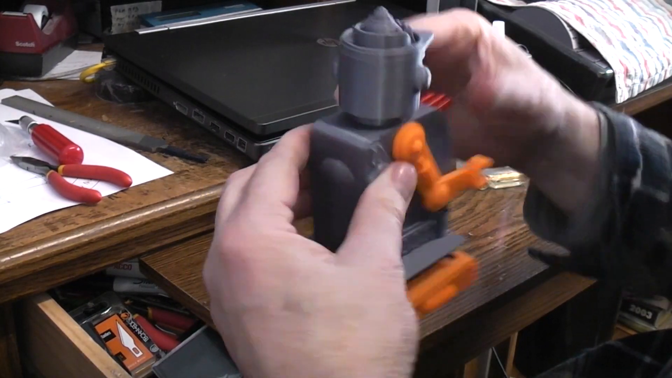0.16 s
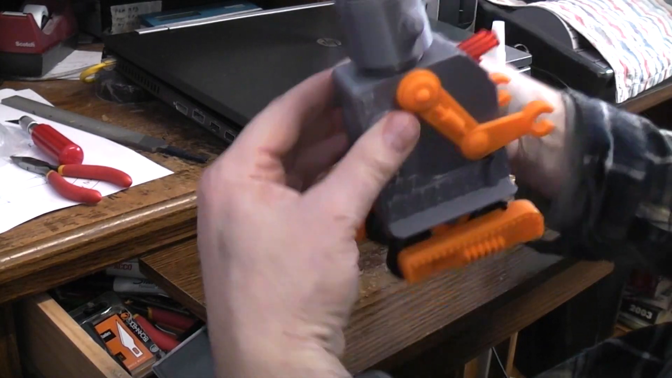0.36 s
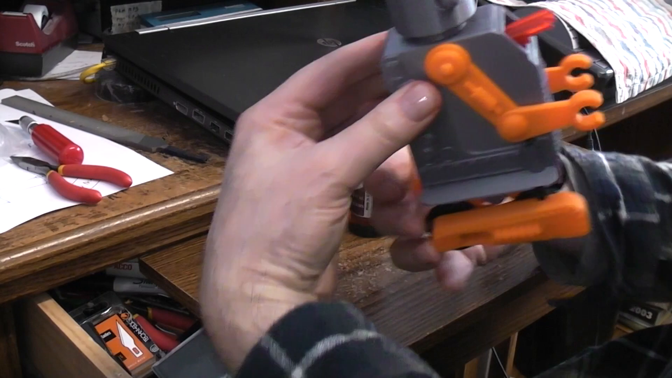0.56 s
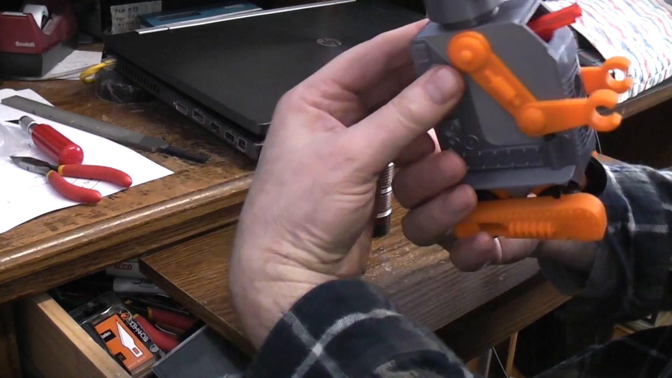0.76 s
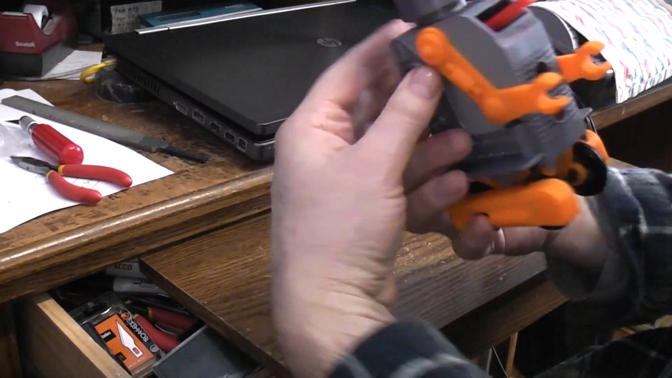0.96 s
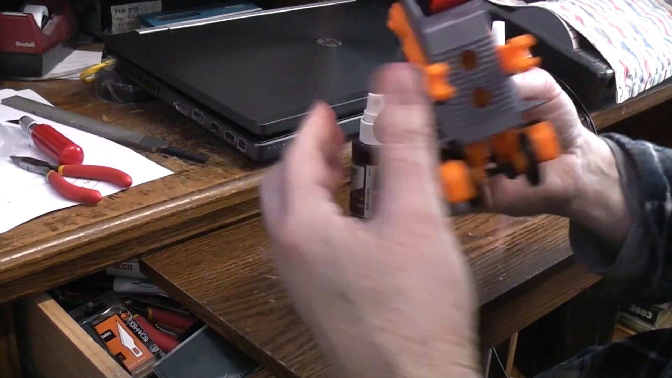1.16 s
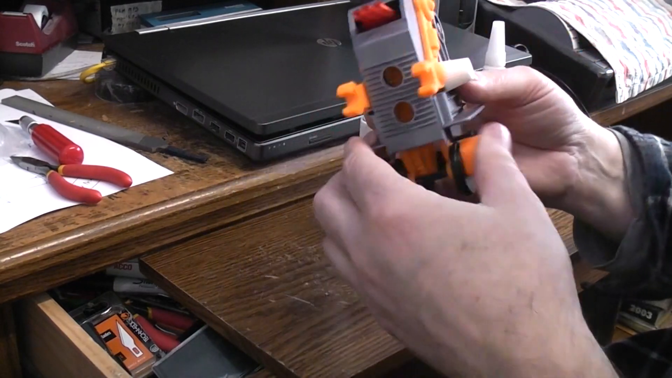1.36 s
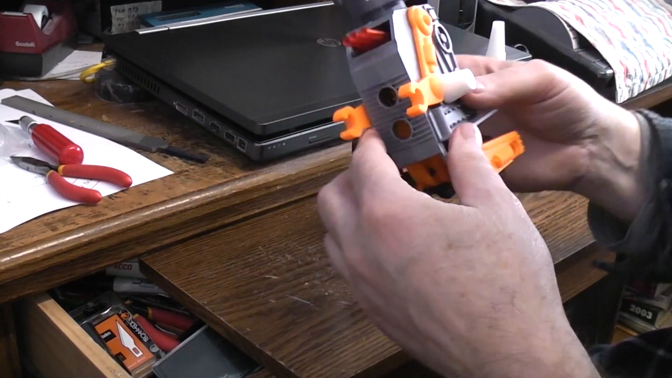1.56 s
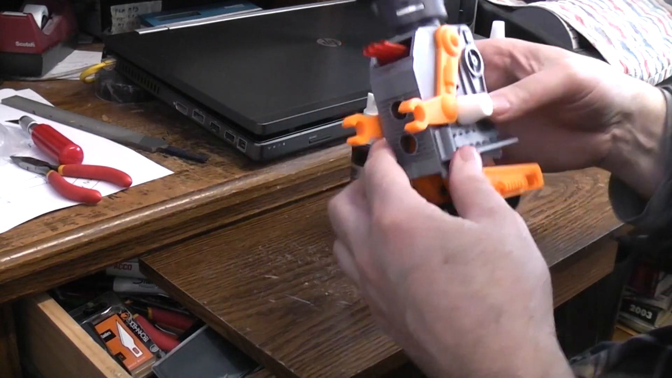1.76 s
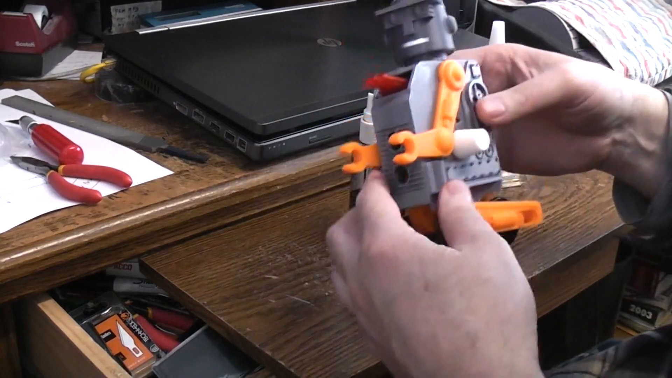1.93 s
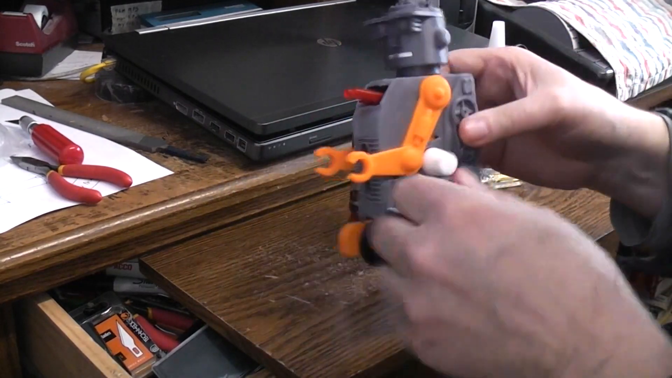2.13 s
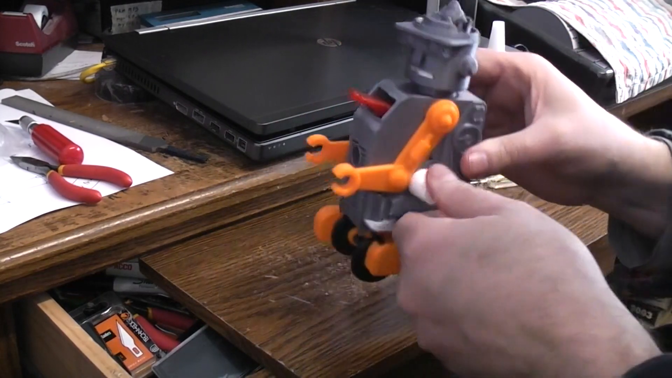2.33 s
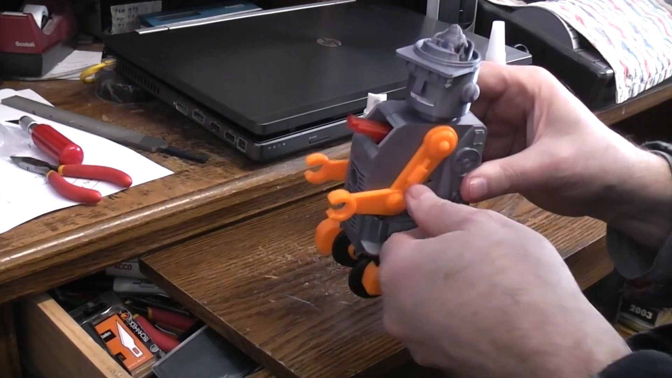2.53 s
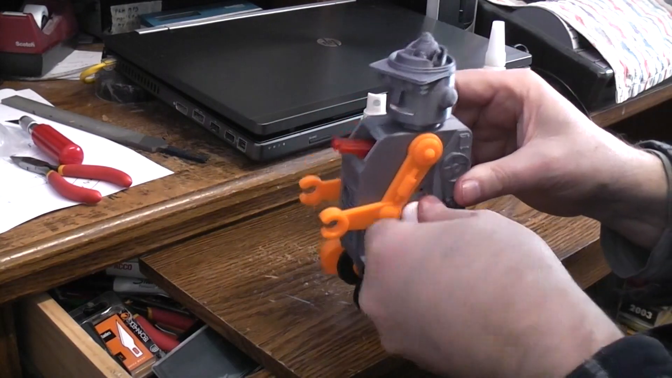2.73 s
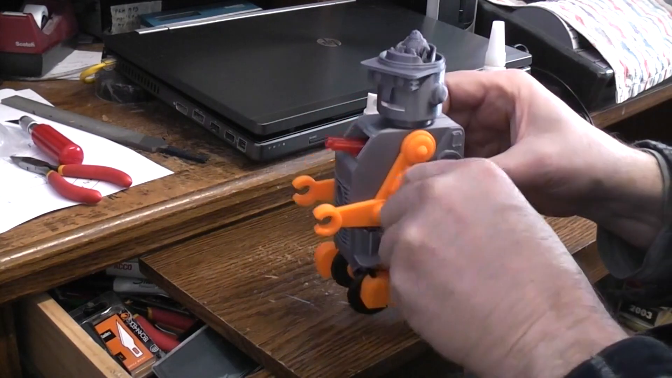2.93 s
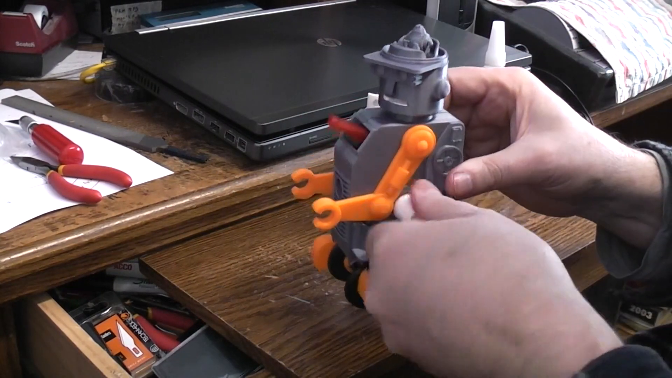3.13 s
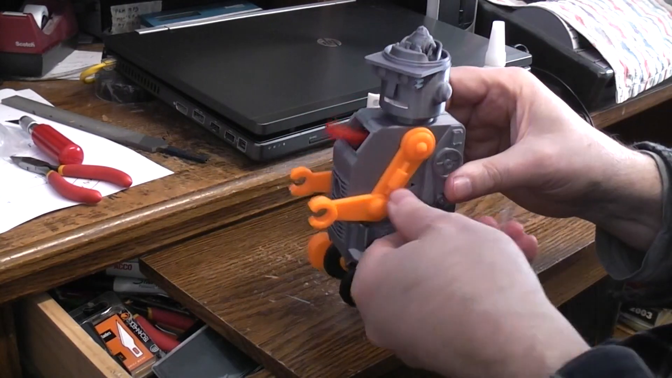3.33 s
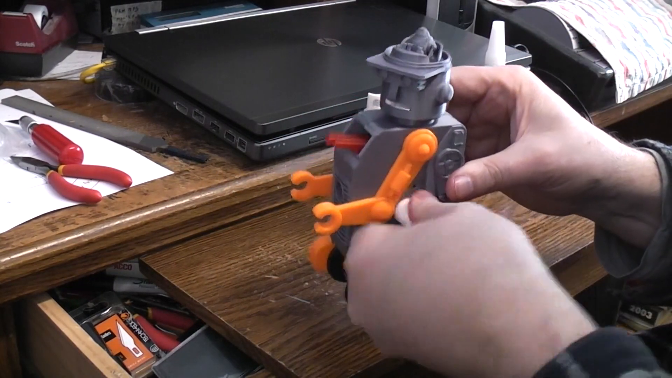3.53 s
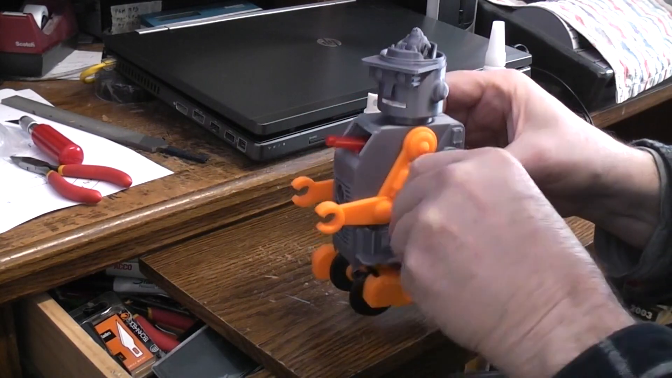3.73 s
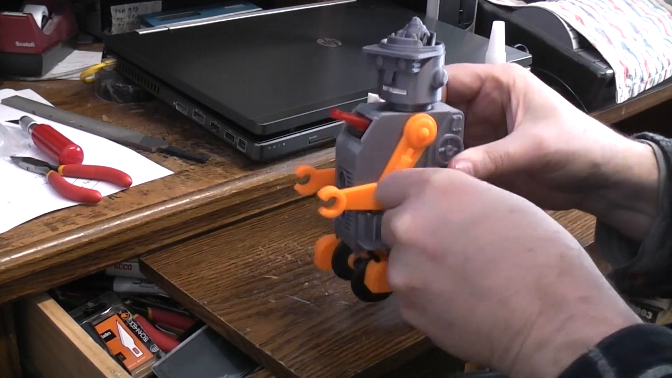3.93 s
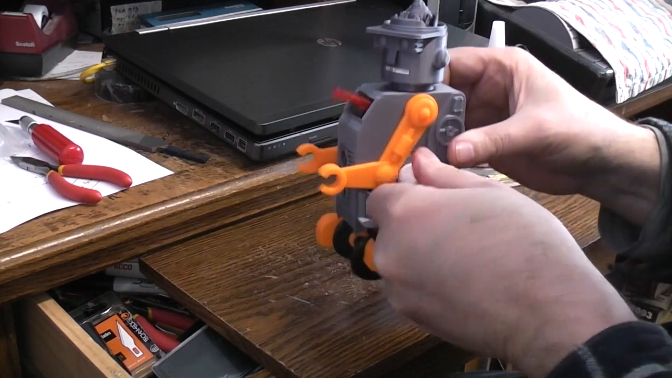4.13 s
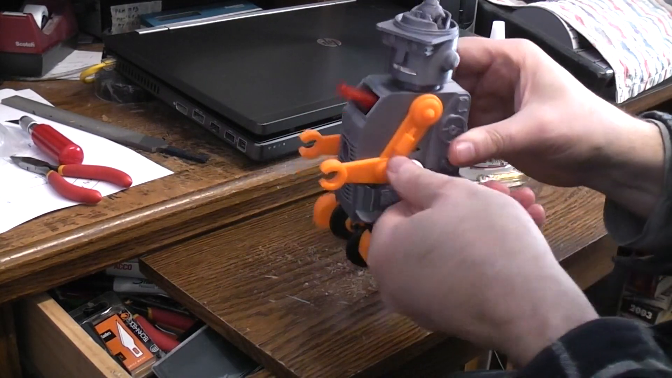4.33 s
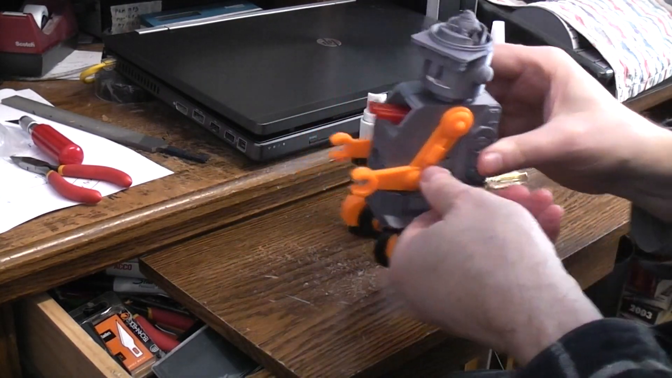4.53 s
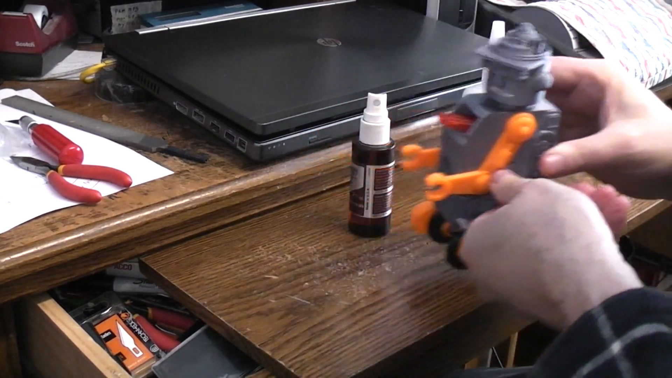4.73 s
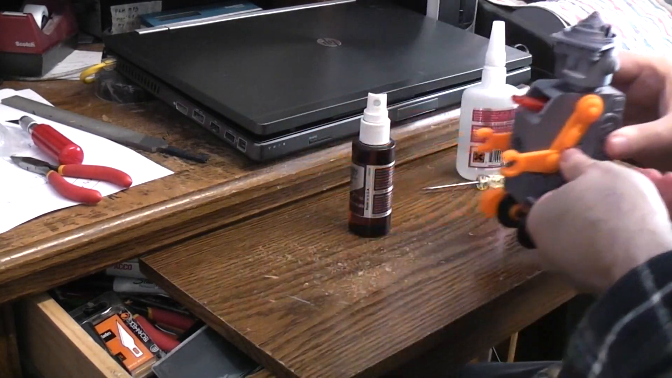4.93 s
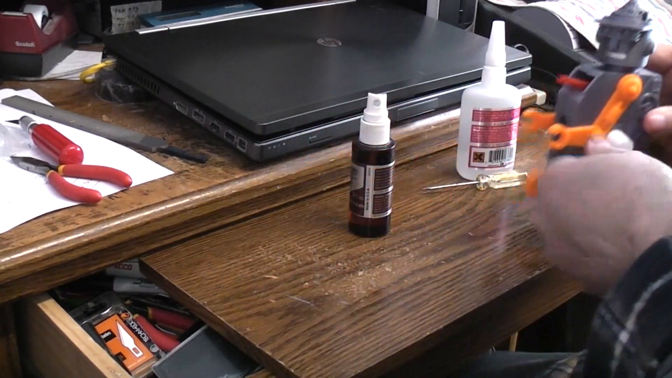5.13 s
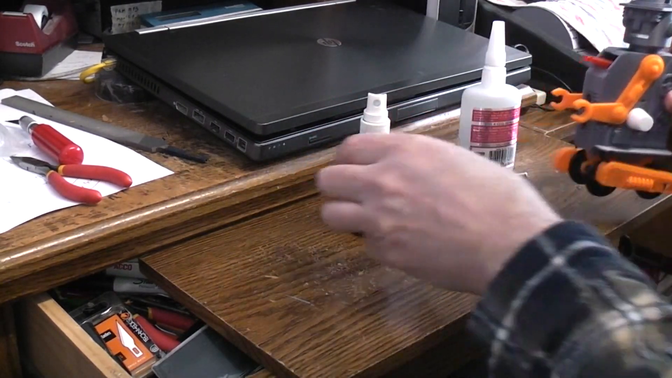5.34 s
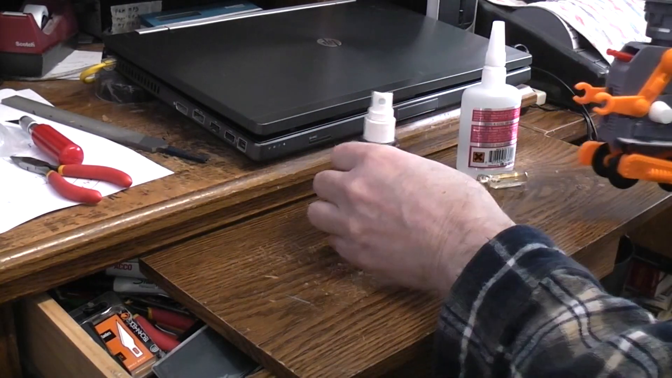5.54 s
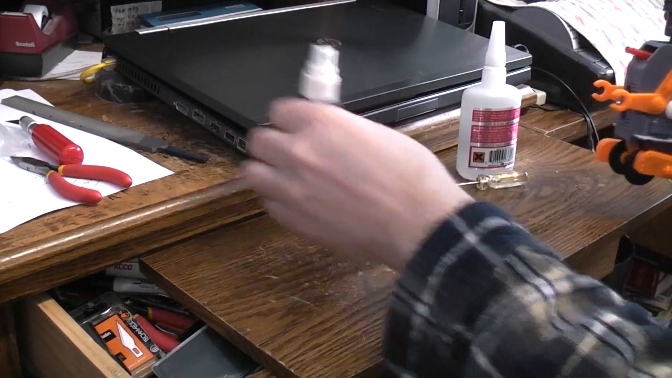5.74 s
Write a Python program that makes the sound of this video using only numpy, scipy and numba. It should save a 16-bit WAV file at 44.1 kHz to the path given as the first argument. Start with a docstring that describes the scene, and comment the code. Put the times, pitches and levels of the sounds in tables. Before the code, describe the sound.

Close by, fingers handle a plastic wind-up toy, its loose parts clacking and rattling unevenly. The knob gives a bright burst of rapid clicks, then the gears grind inside the hollow shell, and the pair of sounds repeats. The winding stops, leaving a soft swish of cloth and a couple of dull bumps on a wooden desk. A fan hums faintly in the quiet room throughout.

```python
"""Winding a toy robot

A plastic wind-up robot is turned over in the hands at a wooden desk, then wound twice. Each back
turn of the knob snaps a pawl (a small catch) over its teeth; each forward turn grinds the gears
in the hollow shell. A sleeve brushes the desk and a small bottle knocks on it. A fan hums in
the quiet room, and an automatic volume control turns everything down during loud clicks."""
import sys
import numpy as np
from scipy import signal
from scipy.fft import rfft, irfft
from scipy.io import wavfile
from scipy.ndimage import uniform_filter1d
from numba import njit

SR = 44100
rng = np.random.default_rng(int(sys.argv[2]) if len(sys.argv) > 2 else 0)


def store_wav(level_fs):
    """Save 16-bit WAV to argv[1]."""
    pcm = np.round(np.clip(np.atleast_2d(level_fs), -1, 1) * 32767)
    wavfile.write(sys.argv[1], SR, pcm.T.astype(np.int16))


N = 255559

# The broad tone of each source. Each row: pitch in Hz, relative level in dB.
AIR_COLOUR = [(25, -11), (40, -28), (52, -5.5), (100, -6.5), (150, 0), (400, -1.5), (750, -2), (950, -5.5),
              (1600, -6), (2000, -10), (5000, -18.5), (16000, -40.5)]
SLEEVE_COLOUR = [(500, -7), (1100, 0.5), (1650, 2.5), (1900, 2.5), (2200, 3), (4000, 3), (7500, -5.5),
                 (10000, -15), (16000, -33)]
DESK_COLOUR = [(50, -12), (140, -3), (400, -1), (600, -6.5), (850, -2.5), (1200, -8), (3000, 6),
               (12000, -32)]
KNOCK_COLOUR = [(200, -37), (600, -10.5), (1050, 1), (2000, -6), (3200, -4), (5000, -2.5), (8500, -11.5),
                (11000, -24), (16000, -43)]
GEAR_COLOUR = [(200, -32), (600, -16.5), (1150, -6), (2100, -5.5), (3300, 2.5), (4700, 1.5), (7500, -0.5),
               (11000, -8), (16000, -24)]
SNAP_COLOUR = [(300, -20), (700, -14.5), (1100, -5), (2100, -13.5), (3300, 2), (7500, 4.5), (10000, 3.5),
               (13000, -6.5), (16000, -6)]
# The pitches at which each part rings. Each row: pitch in Hz, width in Hz, relative strength in dB.
DESK_RINGS = [(163, 40, 2), (248, 44, -3.5), (453, 98, 4), (750, 18, 15.5)]
SHELL_RINGS = [(790, 63, -3.5), (1098, 43, 1.5), (1222, 83, 3), (1580, 20, -19), (1506, 53, 3),
               (1632, 190, 4.5), (2070, 30, 0), (2555, 124, 4.5), (2920, 36, -2), (3226, 124, -3.5),
               (3930, 150, -5), (5190, 370, -9.5), (7150, 56, -7.5)]
PAWL_RINGS = [(1236, 120, 0.5), (1690, 180, 4.5), (2530, 93, 8), (3660, 230, -7.5), (4700, 110, -7),
              (8080, 680, 1.5), (10000, 250, -17)]
# The fan's hum. Each row: pitch in Hz, relative level in dB.
FAN_TONES = [(70.0, -62.5), (145.3, -60.5), (215.3, -62.5), (306.8, -62.5), (360.7, -60)]
# How the room fades. Each row: lowest and highest pitch in Hz, share of ROOM_FADE_S.
ROOM_BANDS = [(60.5, 6200, 0.92), (4970, 13900, 0.64), (9500, 21600, 0.66)]
# Bumps on the desk. Each row: start in seconds, relative level in dB, treble cutoff in Hz.
DESK_BUMPS = [(5.315, -32.5, 450), (5.331, -30.5, 200), (5.600, -26, 950)]
# Longer movements. Each row: start in seconds, length in seconds, relative level in dB.
SLEEVE_BRUSHES = [(4.666, .21, -46), (5.247, 0.037, -46.5), (5.394, 0.2, -61)]
FINGER_GRIPS = [(0.15, 0.095, -46.5), (0.395, 0.52, -46), (0.992, 0.184, -45.5), (1.164, .1, -37),
                (1.523, 0.22, -52), (1.73, 0.37, -49), (2.33, 0.027, -45), (2.64, 0.13, -36.5)]
FORWARD_TURNS = [(3.112, 0.322, -26), (3.912, 0.425, -28)]
# Short hits in the toy. Each row: time in seconds, relative level in dB.
SHELL_KNOCKS = [(0.159, -33.5), (0.286, -33), (0.372, -25.5), (0.437, -22.5), (0.494, -25), (0.51, -28.5),
                (0.596, -27), (0.639, -20.5), (0.756, -28), (0.784, -27), (0.955, -31.5), (1.036, -28),
                (1.062, -28), (1.219, -24), (1.243, -15.5), (1.32, -27), (1.366, -33.5), (1.529, -36),
                (1.567, -28.5), (1.767, -34), (1.822, -24.5), (1.944, -27.5), (1.997, -26.5), (2.114, -29),
                (2.245, -29), (2.351, -25), (2.413, -32), (2.488, -32.5), (2.658, -28), (4.639, -32.5),
                (5.121, -32)]
NAIL_TICKS = [(0.3653, -37), (0.4718, -37), (0.509, -33), (0.7575, -38), (0.7662, -51), (1.0276, -43),
              (1.8864, -38), (1.996, -34), (2.242, -42), (2.4122, -42)]
GEAR_CATCHES = [(2.7384, -15), (3.115, -7.5), (3.1332, -9.5), (3.1773, -9.5), (3.2292, -7.5), (3.3006, -6),
                (3.3671, -3.5), (3.417, 2.5), (3.465, -8.5), (3.563, -28), (3.891, -20.5), (3.9139, -10.5),
                (3.9727, -10.5), (3.996, -9.5), (4.1106, -2), (4.1538, -8), (4.2564, 3), (4.3204, -4),
                (4.3378, -12), (4.368, -5), (4.4594, -11)]
# The knob's speed, one list per back turn. Each row: time in seconds, teeth per second.
BACK_TURN_SPEEDS = [
    [(2.7525, 74.2), (2.7883, 54.8), (2.8229, 24.3), (2.8698, 58.1), (2.96, 22)],
    [(3.5013, 18.1), (3.5869, 38.4), (3.606, 58.7), (3.657, 60.8), (3.77, 26)],
]
# How hard the pawl snaps. Each entry: one back turn's relative level in dB.
BACK_TURN_DB = [-10, -6.5]

ROOM_FADE_S = 0.22  # time to fade by 60 dB


def undb(db):
    """Turn decibels into a multiplier."""
    return 10 ** (np.asarray(db) / 20)


def unit(x):
    """Scale a signal to an average power of 1."""
    return x / np.sqrt(np.mean(x ** 2))


def add(out, s, sound):
    """Mix a sound in at s seconds."""
    i = int(s * SR)
    out[i:i + len(sound)] += sound[:N - i]


def wander(rate):
    """A random drift that heads for a new value `rate` times a second."""
    step = int(SR / rate)
    targets = np.repeat(rng.standard_normal(N // step + 1), step)
    return unit(uniform_filter1d(targets, step)[:N])


def stereo(mid, side):
    """Make left and right from what they share (mid) and what sets them apart (side)."""
    return np.array([mid + side, mid - side])


def place(x, left_db):
    """Make the left side louder than the right by left_db."""
    return x * undb(np.array([[left_db], [-left_db]]) / 2)


def stroke(s, length_s, attack_s, release_s):
    """The strength of one movement: it builds from s seconds, holds and dies away."""
    t = np.arange(N) / SR - s
    rise = 1 - np.exp(-np.maximum(t, 0) / attack_s)
    return rise * np.exp(-np.maximum(t - length_s, 0) / release_s)


def body(x, colour, rings=(), ring_db=0, size=8192):
    """Give x the sound of an object: a broad tone with ringing pitches standing out."""
    freqs = np.maximum(np.arange(size // 2 + 1) * SR / size, 1)
    hz, db = np.transpose(colour)
    peaks = sum(undb(peak_db + ring_db) ** 2 / (1 + (2 * (freqs - centre) / width) ** 2)
                for centre, width, peak_db in rings)
    gain = undb(np.interp(np.log(freqs), np.log(hz), db)) * np.sqrt(1 + peaks)
    # Build a filter that rings only after each hit, never before it.
    cepstrum = irfft(np.log(gain))[:size // 2]
    cepstrum[1:] *= 2
    response = irfft(np.exp(rfft(cepstrum, size)))
    return signal.fftconvolve(x, response / np.linalg.norm(response))[:N]


def contact(decay_s, tilt_db=0, rise_s=0.0001, size=4096):
    """One touch builds, chatters and fades. A harder one is brighter, by tilt_db per octave."""
    t = np.arange(size) / SR
    chatter = rng.standard_normal(size) * (1 - np.exp(-t / rise_s)) * np.exp(-t / decay_s)
    chatter *= np.sqrt(decay_s * SR / 2) / np.linalg.norm(chatter)
    freqs = np.arange(size + 1) * SR / (2 * size)
    octaves = np.log2(np.maximum(freqs, 800) / 2500)
    return irfft(rfft(chatter, 2 * size) * undb(tilt_db * octaves))[:size]


def stick_slip(rate, scatter_db):
    """Rubbing surfaces stick and slip at random, about `rate` times a second."""
    slips = (rng.random(N) < rate / SR) * rng.choice([-1, 1], N)
    sizes = undb(scatter_db * np.clip(rng.standard_normal(N), -2, 2))
    return unit(slips * sizes)


def rattle(rate, decay_s, tilt_db, scatter_db=3, count=600):
    """Small uneven taps follow each other, about `rate` a second."""
    out = np.zeros(N)
    for s in np.cumsum(rng.uniform(0.5, 1.5, count)) / rate:
        tap = undb(scatter_db * rng.standard_normal()) * contact(decay_s, tilt_db, size=512)
        if s < N / SR:
            add(out, s, tap)
    return unit(out)


def fan():
    """A fan makes a steady rush of air and a wavering hum."""
    mid, side = (body(rng.standard_normal(N), AIR_COLOUR) for _ in range(2))
    t = np.arange(N) / SR
    hum = sum(np.sqrt(2) * undb(db) * np.sin(2 * np.pi * hz * t + 0.83 * wander(rate=7))
              for hz, db in FAN_TONES)
    return undb(-52.5) * stereo(mid, undb(-8) * side) + undb(-5) * hum


def room_tail(size=16384, rise_s=0.0012, width_db=-6.5):
    """Sound lingers in the small room, and the treble dies first."""
    t = np.arange(size) / SR
    tail = 0
    for low_hz, high_hz, share in ROOM_BANDS:
        band = signal.butter(3, [low_hz, high_hz], "band", fs=SR, output="sos")
        fade = undb(-60 * t / (share * ROOM_FADE_S))
        tail = tail + signal.sosfilt(band, rng.standard_normal((2, size))) * fade
    tail *= 1 - np.exp(-t / rise_s)
    mid, side = tail / np.linalg.norm(tail, axis=1, keepdims=True)
    return stereo(mid, undb(width_db) * side)


def room(x, echo_s=0.0085, echo_db=-17.5):
    """The room adds one close echo and a tail that changes as the source is moved about."""
    echo = np.zeros(N)
    add(echo, echo_s, undb(echo_db) * x)
    blend = 2 * wander(rate=5)
    tail = sum(signal.fftconvolve((x * share)[None], room_tail(), axes=1)[:, :N]
               for share in (np.cos(blend), np.sin(blend)))
    return x + echo + tail


def desk():
    """A sleeve slides over the wood, which booms under the soft arm and the harder bottle."""
    sliding = sum(undb(db) * stroke(s, length_s, attack_s=0.027, release_s=0.046)
                  for s, length_s, db in SLEEVE_BRUSHES)
    cloth = sliding * stick_slip(rate=7000, scatter_db=0)
    force = np.zeros(N)
    for s, db, cutoff_hz in DESK_BUMPS:
        soften = signal.butter(3, cutoff_hz, fs=SR, output="sos")
        add(force, s, undb(db) * signal.sosfilt(soften, contact(decay_s=0.0087, rise_s=0.0014)))
    return body(cloth, SLEEVE_COLOUR) + body(force, DESK_COLOUR, DESK_RINGS, ring_db=5)


def grip():
    """How hard the fingers work on the shell at each moment."""
    return sum(undb(db) * stroke(s, length_s, attack_s=0.02, release_s=0.017)
               for s, length_s, db in FINGER_GRIPS)


def fingertips():
    """Fingernails tick brightly on the plastic, and faintly at each knock. A fine crackle and skin hiss follow
    the grip."""
    crackle = undb(-18.5) * rattle(rate=22, decay_s=0.0006, tilt_db=-4)
    skin = undb(-30.5) * stick_slip(rate=6000, scatter_db=-1)
    force = grip() * (crackle + skin)
    for s, db in NAIL_TICKS:
        add(force, s, undb(db - 2.5) * contact(decay_s=0.00099, tilt_db=-1.2))
    for s, db in SHELL_KNOCKS:
        add(force, s, undb(db - 20.5) * contact(decay_s=0.00097))
    return body(force, SNAP_COLOUR)


def limb_ring(push, low_hz=2500, high_hz=3700, width_hz=520, ring_db=3):
    """A loose limb adds a short clack at a pitch of its own."""
    hz = rng.uniform(low_hz, high_hz)
    ring = signal.lfilter(*signal.iirpeak(hz, hz / width_hz, fs=SR), push)
    return push + undb(ring_db) * ring


def handling():
    """Fingers rub the shell and stir loose parts. A limb scrapes, knocks and bounces once."""
    rubbing = undb(-16.5) * stick_slip(rate=820, scatter_db=20) * undb(1.2 * wander(rate=40))
    loose_parts = undb(-12.5) * rattle(rate=35, decay_s=0.0035, tilt_db=-2)
    force = grip() * (rubbing + loose_parts)
    bounce_delays = rng.uniform(0.0036, 0.06, len(SHELL_KNOCKS))
    for (s, db), bounce_s in zip(SHELL_KNOCKS, bounce_delays):
        tilt_db = -3.94 - 0.7 * rng.standard_normal()
        scrape = contact(decay_s=0.0076, rise_s=0.0055)
        knock = limb_ring(contact(decay_s=0.0028, tilt_db=tilt_db, rise_s=0.0033))
        add(force, s - 0.008, undb(db - 18) * scrape)
        add(force, s - 0.001, undb(db - 8) * knock)
        add(force, s + bounce_s, undb(db - 14) * contact(decay_s=0.001))
    return body(force, KNOCK_COLOUR, SHELL_RINGS, ring_db=4.5)


def gears(slack_db=-10.5, lead_s=0.036, trail_s=0.18):
    """Gears grind against the spring. Teeth tick past, and now and then one catches hard."""
    effort = np.zeros(N)
    for s, length_s, db in FORWARD_TURNS:
        loaded = stroke(s, length_s, attack_s=0.011, release_s=0.02)
        # The gears turn lightly before and after the spring pushes back.
        slack = stroke(s - lead_s, lead_s + length_s + trail_s, attack_s=0.0067, release_s=0.011)
        effort += undb(db) * np.maximum(loaded, undb(slack_db) * slack)
    grinding = undb(-6) * undb(1.8 * wander(rate=120)) * stick_slip(rate=2200, scatter_db=2)
    ticking = undb(-7.5) * rattle(rate=75, decay_s=0.00106, tilt_db=0)
    force = effort * (grinding + ticking)
    for s, db in GEAR_CATCHES:
        add(force, s, undb(db - 7) * contact(decay_s=0.0023, tilt_db=-1.5, rise_s=0.0015))
    return body(force, GEAR_COLOUR, SHELL_RINGS, ring_db=14)


def tooth_times(speed):
    """The moments when a tooth passes the pawl, the first as the knob starts to move."""
    s, rate = np.transpose(speed)
    t = np.arange(s[0], s[-1], 1 / SR)
    teeth_passed = np.cumsum(np.interp(t, s, rate)) / SR
    return np.interp(np.arange(np.ceil(teeth_passed[-1])), teeth_passed, t)


def ratchet(crack_db=5, scatter_db=1.3, bounce_s=0.008, bounce_db=-14):
    """The pawl breaks free with a dry crack, then snaps, chatters and bounces once on each tooth."""
    force, cracks = np.zeros(N), np.zeros(N)
    for speed, turn_db in zip(BACK_TURN_SPEEDS, BACK_TURN_DB):
        times = tooth_times(speed) + 0.0006
        add(cracks, times[0], undb(turn_db + crack_db) * contact(decay_s=0.0006))
        for s in times:
            db = turn_db + scatter_db * rng.standard_normal()
            snap = contact(decay_s=0.00024)
            chatter = undb(-0.5) * contact(decay_s=0.0017)
            add(force, s, undb(db) * (snap + chatter))
            landing_s = s + bounce_s * rng.uniform(0.8, 1.2)
            add(force, landing_s, undb(db + bounce_db) * contact(decay_s=0.0022))
    return undb(9) * (body(force, SNAP_COLOUR, PAWL_RINGS, ring_db=6.5) + body(cracks, SNAP_COLOUR))


def scene():
    """The toy and the desk sound in the room, over the fan."""
    toy = room(ratchet() + gears() + handling() + fingertips())
    return place(toy, left_db=0.76) + place(room(desk()), left_db=0.5) + place(fan(), left_db=-1)


@njit
def follow_peaks(x, release):
    """Track the level: jump up at once, fall back slowly."""
    levels, level = np.empty(len(x)), 0.
    for i in range(len(x)):
        level = max(x[i], level * release)
        levels[i] = level
    return levels


def record(dry, ceiling_db=-17.5, treble_db=-5, release_s=0.084, overload_db=-6, top_hz=16100):
    """A fast volume control, most alert to treble, holds the level down. The top treble is cut."""
    brightened = dry + undb(treble_db) * np.diff(dry, prepend=0)
    level = uniform_filter1d(np.abs(brightened).max(axis=0), size=44)
    peak = follow_peaks(level, np.exp(-1 / (release_s * SR)))
    gain = np.minimum(1, undb(ceiling_db) / (peak + 1e-9))
    gain = uniform_filter1d(gain, size=60)
    # Short cracks slip past and are rounded off.
    rounded = undb(overload_db) * np.tanh(dry * gain / undb(overload_db))
    return signal.sosfilt(signal.ellip(8, 0.2, 70, top_hz, fs=SR, output="sos"), rounded)


dry = scene()
out = record(dry)
store_wav(out)
```